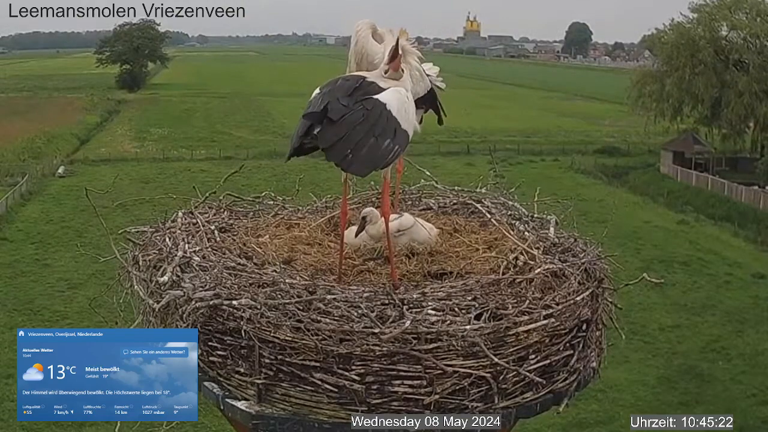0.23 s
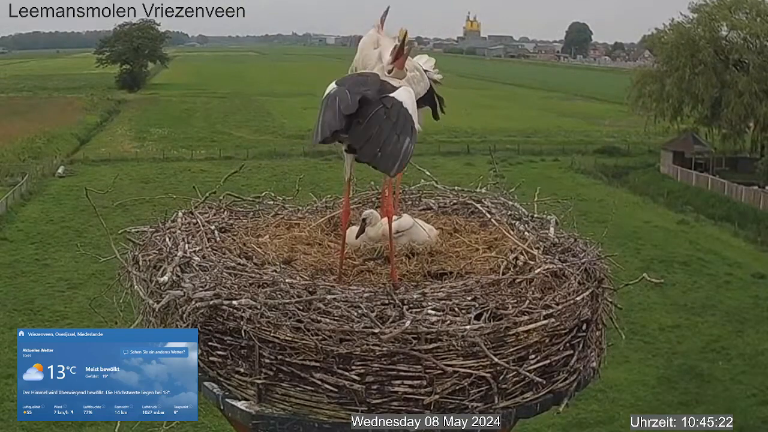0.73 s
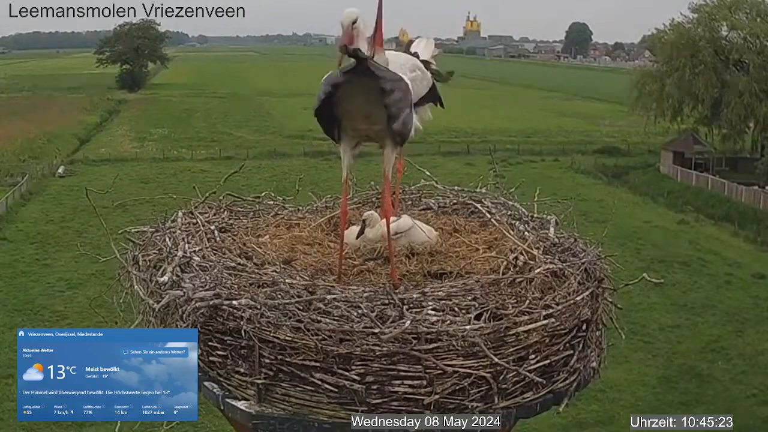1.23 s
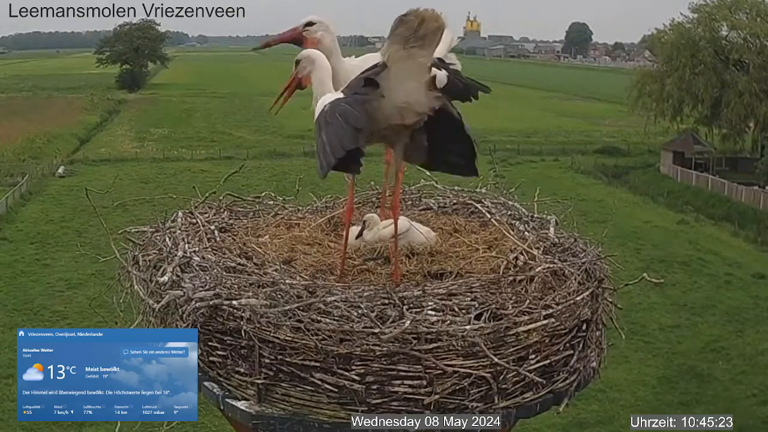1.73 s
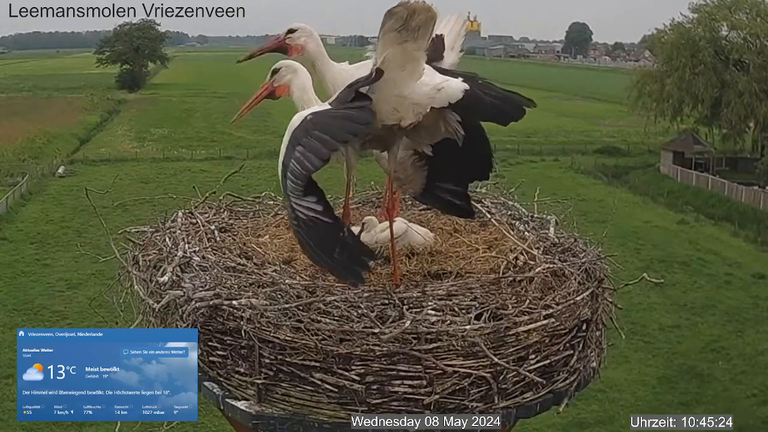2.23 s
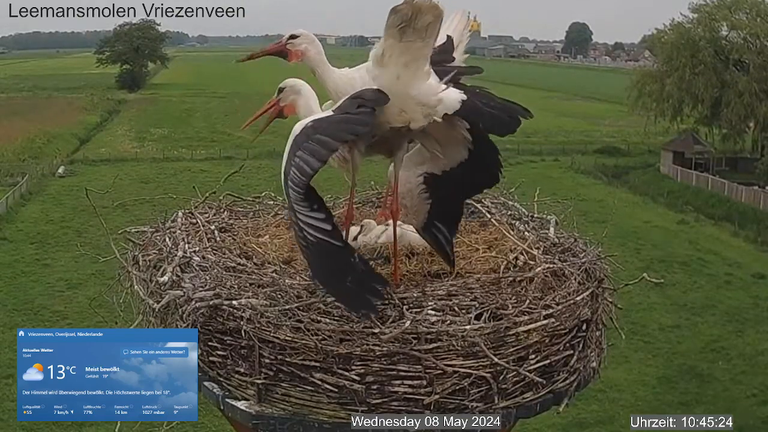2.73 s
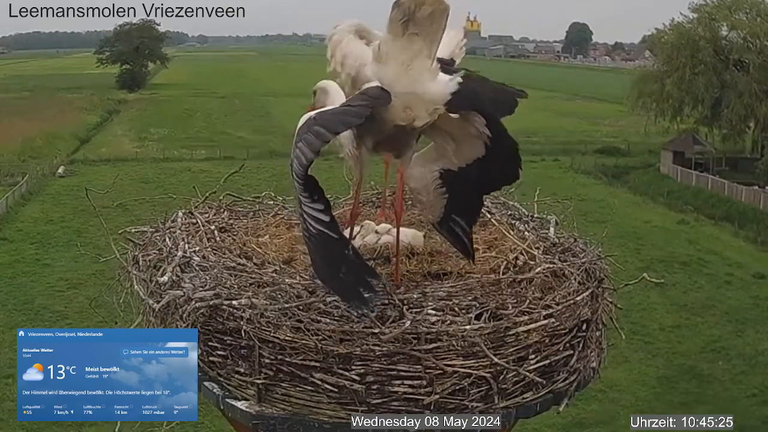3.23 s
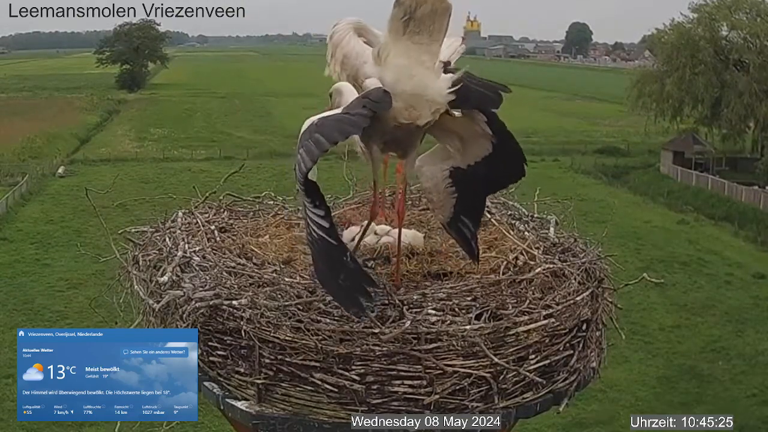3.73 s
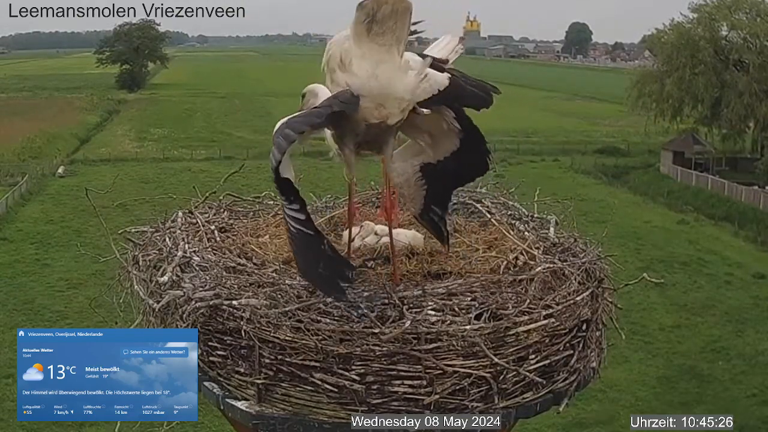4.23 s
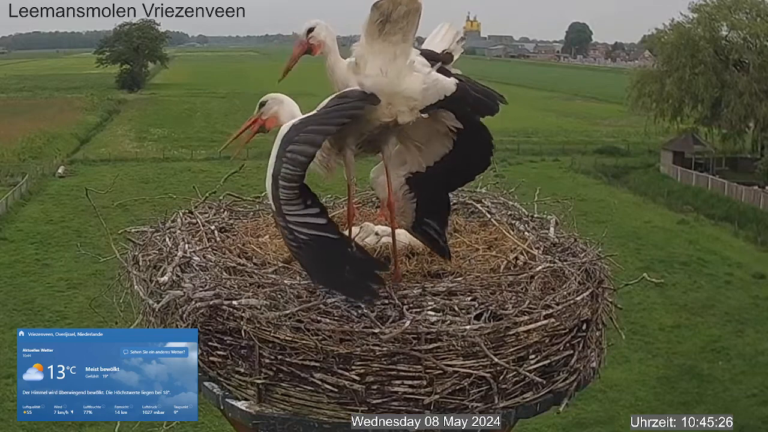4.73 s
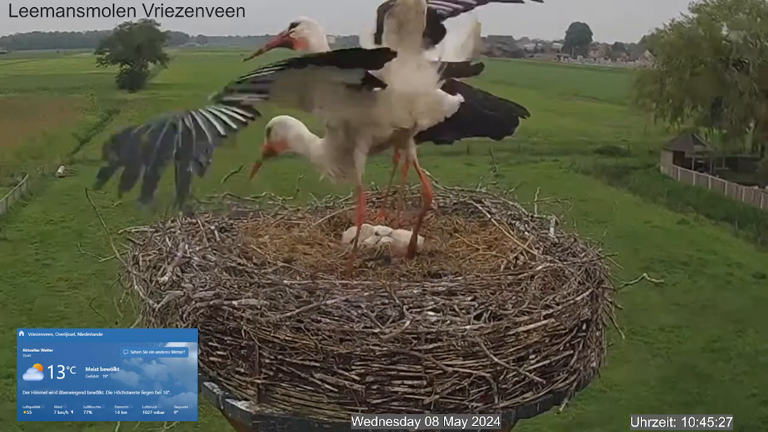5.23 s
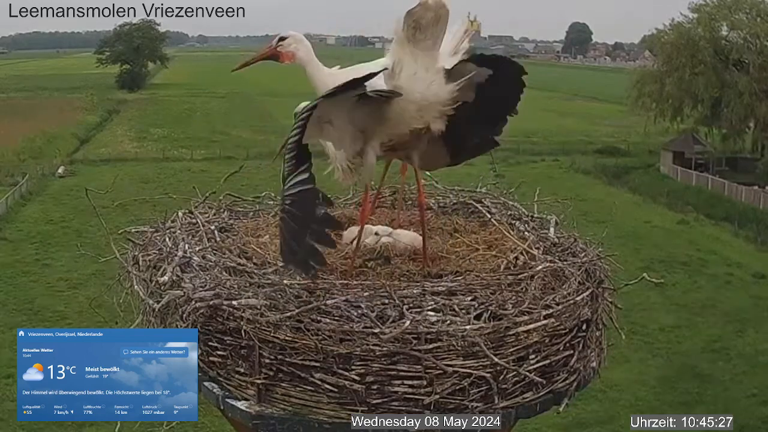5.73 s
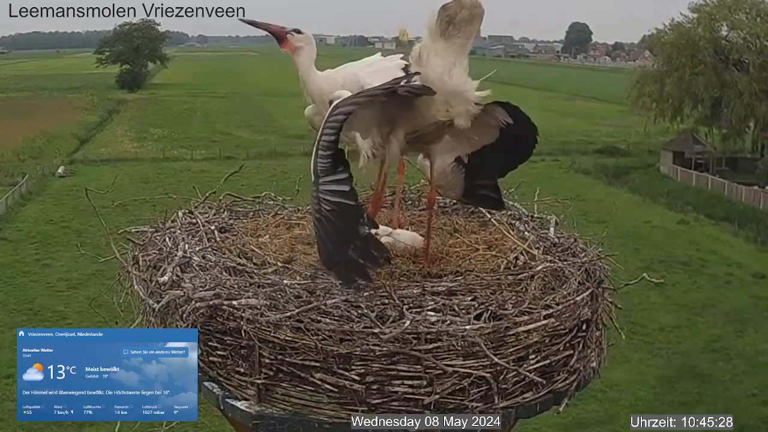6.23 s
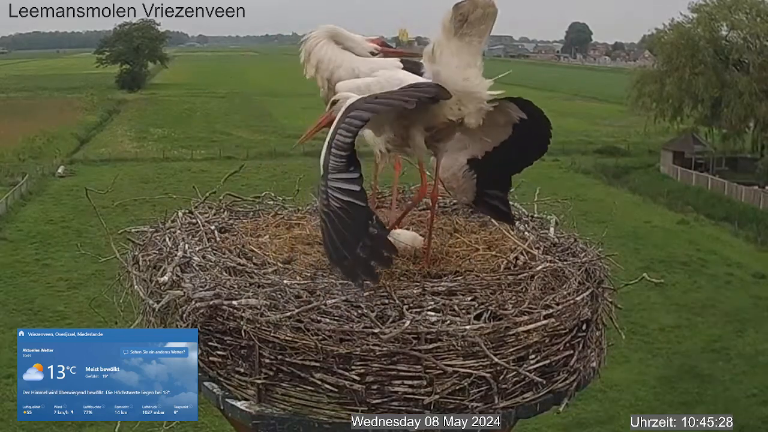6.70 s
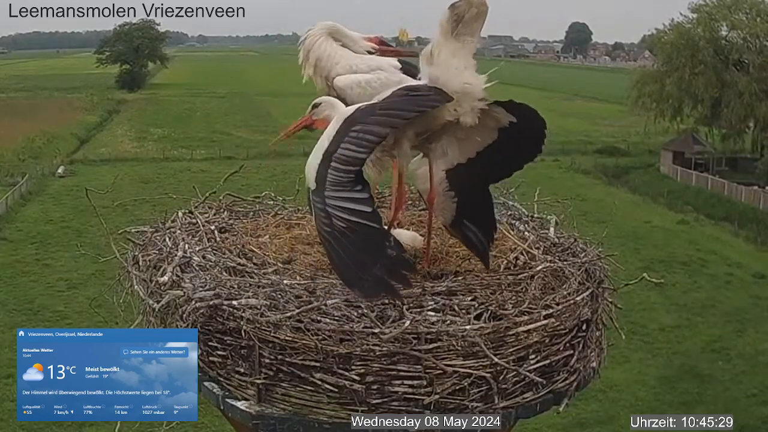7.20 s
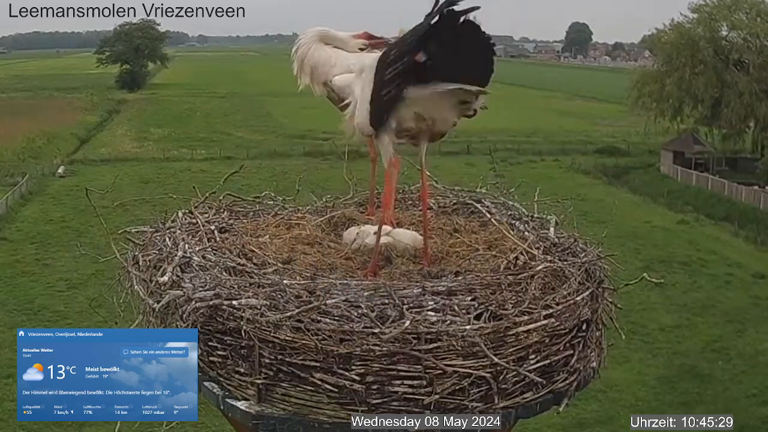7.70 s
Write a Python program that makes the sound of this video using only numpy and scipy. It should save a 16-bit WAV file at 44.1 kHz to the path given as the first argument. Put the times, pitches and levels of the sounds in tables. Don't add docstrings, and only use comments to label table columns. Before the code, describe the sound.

From the start a stork claps its bill in hard, hollow wooden knocks, about ten per second; a second, weaker and quicker to the ear, joins almost at once. Through the first second a chick wheezes airily, then rasps and peeps low around 1.0 to 1.4 s. The claps slow to about seven or eight per second by 1.5 s and turn drier, the two birds slipping in and out of step. A clear double peep sounds near 2.9 s. From 3.2 s one bird speeds to about twelve claps per second, slows after 4.3 s, then quickens again from 6.3 s. Low wind thumps come irregularly, strongest from 2.8 to 5.8 s. At 7.5 s a wingbeat puffs softly and the slower bird quickens, the rattle continuing to the end. Faint rustle, distant birds and thin hiss lie beneath; the outdoor sound is close, narrow and almost without echo.

```python
import sys
import numpy as np
from scipy import signal
from scipy.fft import rfft, irfft
from scipy.io import wavfile

SR = 44100
rng = np.random.default_rng(int(sys.argv[2]) if len(sys.argv) > 2 else 0)


def to_linear_factor(level_db):
    exponent = np.asarray(level_db, float) / 20
    return 10 ** exponent


def materialize(psi):
    bounded = np.clip(np.atleast_2d(psi).T, -1, 1)
    quanta = np.round(bounded * 32767).astype(np.int16)
    wavfile.write(sys.argv[1], SR, quanta)


N = 351036
LEAD_SAMPLES = 441


def evened(x):
    return x / np.sqrt(np.mean(x ** 2) + 1e-20)


def band(x, lo_hz, hi_hz, order=3):
    return signal.sosfilt(signal.butter(order, [lo_hz, hi_hz], "bandpass", fs=SR, output="sos"), x)


def lumps(rate_hz):
    return evened(signal.lfilter(*signal.butter(2, rate_hz, fs=SR), rng.standard_normal(N)))


def resonate(x, hz, width_hz):
    turn = np.exp(2j * np.pi * np.cumsum(hz) / SR)
    r = np.exp(-np.pi * width_hz / SR)
    return 2 * (turn * signal.lfilter([1 - r], [1, -r], x / turn)).real


def ring(t, db, hz, t60_s, rise_s):
    t = np.maximum(t, 0)
    return -to_linear_factor(db - 60 * t / t60_s) * (1 - np.exp(-t / rise_s)) * np.sin(2 * np.pi * hz * t)


def knock(t, blow_db, pouch_hz, horn_hz, pouch_db, share, snap_db, luck):
    # hz, level_db
    overtones = [(3483, 1), (4275, -10.5), (5250, -6.5), (6450, -9.5), (5983, -6.5)]
    pouch_t60_s = 0.025 * (700 / pouch_hz) ** 3.55
    clamp_db = -.45 * (np.clip(blow_db, -40, -20) + 31.5)
    horn_t60_s = 0.017 * share * (1650 / np.maximum(horn_hz, 1620)) ** 2.7 * to_linear_factor(clamp_db)
    sound = ring(t, pouch_db + 1.1, pouch_hz, pouch_t60_s, 0.00032)
    sound = sound + ring(t, -3.5, horn_hz, horn_t60_s, 0.00016)
    body_db = 0.84 + 10 * (horn_hz - 1850) / 1000
    sound = sound + ring(t, body_db, 0.8644 * horn_hz, 0.0063, 0.00091)
    upper_hz = 2612 * (horn_hz / 1650) ** 0.74 * (1 + 0.027 * luck[1])
    upper_db = -9.5 + luck[0] + 0.02 * (np.clip(blow_db, -45, -25) + 31)
    sound = sound - ring(t, upper_db, upper_hz, 0.01, .0001)
    for k, (hz, db) in enumerate(overtones):
        tip_hz = hz * (1 + luck[6 + k] / 30)
        sound = sound + ring(t, snap_db + db + 2 * luck[2 + k], tip_hz, 0.013, .00005)
    u = (t - .00012) / .00009
    return sound - to_linear_factor(snap_db + 6.5) * (1 - u ** 2) * np.exp(-u ** 2 / 2)


def posed(claps, posture, share, blow_extra_db, rebound_extra_db, lag_s):
    s, db = np.transpose(claps)
    when_s, *colour = np.transpose(posture)
    pouch_hz, horn_hz, pouch_db, snap_db = (np.interp(s, when_s, c) for c in colour)
    return np.array([s + lag_s, db, snap_db, snap_db + blow_extra_db, snap_db + rebound_extra_db,
                     pouch_hz, horn_hz, pouch_db, share + 0 * s])


def bills():
    # start_s, blow_db
    slow_opening = [(-0.0011, -32), (.0927, -27.5), (.1932, -29.5), (.291, -28), (.3914, -28),
                    (.4912, -29.5), (.5908, -29.5), (.6926, -29.5), (.8002, -28), (.9035, -29.5),
                    (1.012, -32), (1.1272, -38.5), (1.2462, -43.5), (1.3748, -44), (1.5149, -48),
                    (1.6471, -41.5)]
    slow_stretch = [(1.7885, -36.5), (1.935, -36.5), (2.0802, -30.5), (2.2253, -30.5), (2.3716, -31.5),
                    (2.5157, -32.5), (2.6594, -32), (2.8019, -34), (2.944, -34.5), (3.0868, -34.5),
                    (3.2297, -36), (3.372, -35), (3.5118, -33), (3.6543, -40), (3.7971, -39),
                    (3.9372, -32.5), (4.079, -36.5), (4.2197, -33.5), (4.3601, -34), (4.5035, -38.5),
                    (4.6494, -32), (4.798, -34), (4.9455, -34.5)]
    slow_closing = [(5.0906, -32), (5.233, -35), (5.522, -31), (5.667, -33.5), (5.8138, -38.5),
                    (5.959, -34), (6.1041, -38), (6.247, -32), (6.39, -34), (6.5329, -32), (6.8133, -39.5),
                    (6.9501, -32.5), (7.0876, -35), (7.2141, -40.5), (7.4696, -36.5), (7.5567, -32),
                    (7.6504, -33), (7.7465, -32), (7.84, -29.5), (7.936, -30)]
    # start_s, blow_db
    quick_opening = [(.0862, -43), (.1784, -42), (.2709, -41), (.3635, -47), (.4623, -46), (.5601, -43),
                     (.6578, -43.5), (.7586, -41), (.8632, -38.5), (.9726, -37.5), (1.0896, -35.5),
                     (1.2096, -34.5), (1.3305, -38), (1.4547, -36.5), (1.5776, -32), (1.7071, -31.5),
                     (1.8316, -30.5), (1.9583, -30.5), (2.0873, -30), (2.2121, -32), (2.3409, -30),
                     (2.4654, -34.5), (2.59, -32), (2.7108, -30), (2.8205, -30.5), (2.914, -43.5)]
    quick_second = [(3.012, -65), (3.171, -59), (3.2515, -35), (3.3343, -42.5), (3.4159, -44),
                    (3.5006, -37), (3.5861, -42.5), (3.6693, -36.5), (3.7523, -41.5), (3.839, -38.5),
                    (3.9271, -38.5), (4.0153, -42), (4.104, -36), (4.2006, -32), (4.305, -36.5),
                    (4.415, -37.5), (4.5285, -32), (4.6436, -36), (4.7624, -31.5), (4.8808, -30.5),
                    (5.0051, -33), (5.1277, -33), (5.254, -32), (5.3797, -30), (5.5102, -33), (5.638, -34),
                    (5.7637, -34), (5.8878, -34.5), (6.0115, -30.5)]
    quick_third = [(6.1291, -29), (6.2356, -32.5), (6.3363, -32), (6.4318, -31), (6.521, -42.5),
                   (6.5988, -48), (6.6731, -38), (6.7499, -42.5), (6.8259, -37), (6.9001, -40.5),
                   (6.9778, -40), (7.059, -41), (7.1413, -37), (7.2262, -34), (7.3133, -40.5),
                   (7.4022, -38.5), (7.489, -33.5), (7.577, -34.5), (7.6656, -34.5), (7.7531, -33.5),
                   (7.9411, -32.5)]
    # start_s, pouch_hz, horn_hz, pouch_db (above horn), snap_db (toward the microphone)
    slow_posture = [(0, 837, 1725, -9.5, -15.5), (.5, 925, 1608, -6, -23), (.9, 882, 1780, -9, -21),
                    (1.37, 970, 1810, 2, -12), (1.65, 767, 2190, -4, -11.5), (2.08, 730, 2057, -9, -17.5),
                    (2.8, 762, 1930, -10, -18.5), (2.95, 730, 1850, -10.5, -17.5),
                    (3.23, 750, 1900, -7, -18.5), (4.22, 758, 1996, -3.5, -20), (4.65, 757, 1872, -8, -17),
                    (5.52, 767, 1900, -9.5, -21.5), (5.67, 750, 1915, -9.5, -19.5),
                    (6.39, 772, 1930, -8.5, -17), (6.81, 790, 1944, -8.5, -16), (7.21, 860, 1896, -3, -12),
                    (7.47, 954, 1410, -3, -28.5), (7.84, 987, 1712, -5, -19)]
    quick_posture = [(.08, 850, 1606, -9, -6), (0.559, 840, 1683, -2, -8), (.87, 830, 1640, -10.5, -4),
                     (1.33, 726, 2160, -5.5, -15), (1.46, 700, 2106, -9.5, -12.5),
                     (1.57, 679, 1763, -15, -15.5), (1.83, 673, 1800, -15, -21.5),
                     (2.7, 696, 1850, -15.5, -19.5), (2.92, 790, 1790, -13, -17),
                     (3.3, 843, 1585, -14.5, -9.5), (3.67, 973, 1592, -5, -7.5),
                     (4.42, 846, 1660, -9.5, -17.5), (4.76, 704, 1976, -13.5, -18.5),
                     (5.642, 677, 1874, -12.5, -19), (6.43, 775, 1737, -17, -25.5),
                     (6.601, 815, 1574, -5.5, -22), (6.9, 990, 1612, -2.5, -15),
                     (7.95, 923, 1653, -4, -29.5)]
    slow = posed(slow_opening + slow_stretch + slow_closing, slow_posture,
                 share=0.8143, blow_extra_db=0, rebound_extra_db=-2, lag_s=.0006)
    quick = posed(quick_opening + quick_second + quick_third, quick_posture,
                  share=0.9, blow_extra_db=7, rebound_extra_db=-11, lag_s=.0003)
    s, db, snap_db, blow_snap_db, rebound_snap_db, *colour = np.hstack([slow, quick])[:, :, None]
    luck = np.clip(rng.standard_normal((len(s), 13)), -2, 2).T[:, :, None]
    t = np.arange(2600) / SR
    swing_s = 1 / colour[1]
    touch = to_linear_factor(-14.5 + 2 * luck[12]) * knock(t, db, *colour, snap_db - 7, luck)
    blow = knock(t - 1.049 * swing_s, db, *colour, blow_snap_db, luck)
    rebound_s = (3.166 + luck[10] / 20) * swing_s
    rebound = to_linear_factor(9.5 + luck[11]) * knock(t - rebound_s, db, *colour, rebound_snap_db, luck[::-1])
    claps = (touch + blow + rebound) * to_linear_factor(db + 0.5)
    bodies = rng.standard_normal(claps.shape) * to_linear_factor(-30 - 60 * t / .022) * (t > .001)
    claps = claps + signal.fftconvolve(claps, bodies, axes=1)[:, :2600]
    out = np.zeros(N + 2 * LEAD_SAMPLES + 2600)
    first = np.round((s - .0009) * SR).astype(int) + LEAD_SAMPLES
    np.add.at(out, first + np.arange(2600), claps)
    out = signal.lfilter(*signal.iirnotch(1190, 4.5, SR), out)
    return band(out, 555, 6700)[LEAD_SAMPLES:LEAD_SAMPLES + N]


def nest(x):
    t = np.arange(9000) / SR
    tail = rng.standard_normal(len(t)) * to_linear_factor(-60 * t / .11) * (t > .004)
    tail = np.diff(tail)
    return to_linear_factor(-21) * signal.oaconvolve(x, tail / np.linalg.norm(tail) * 2)[:N]


def whistles(calls):
    out, air = np.zeros(N), rng.standard_normal(N)
    for s, length_s, db, from_hz, to_hz, blur_hz in calls:
        at = round(s * SR)
        hz = np.linspace(from_hz, to_hz, round(length_s * SR))
        voice = resonate(air[at:at + len(hz)], hz, blur_hz)
        voice = evened(resonate(voice, hz, blur_hz))
        out[at:at + len(hz)] += to_linear_factor(db) * voice * signal.windows.tukey(len(hz), 0.56)
    return out


def chick():
    # start_s, length_s, level_db, from_hz, to_hz
    wheezes = [
        (0.058, .06, -69.5, 2180, 2470),
        (0.114, 0.085, -65, 2650, 2900),
        (0.586, 0.15, -76, 2900, 2650),
        (0.76, 0.12, -62.5, 2620, 2720),
        (0.855, .1, -63.5, 2520, 2350),
        (1.47, 0.084, -72, 2450, 2450),
        (1.88, 0.083, -69.5, 2740, 2880),
        (6.242, 0.24, -71, 2660, 2480),
    ]
    # start_s, length_s, level_db, from_hz, to_hz
    peeps = [
        (1.069, 0.09, -64, 1296, 1200),
        (1.313, 0.1, -67, 1304, 980),
        (2.4, 0.046, -83, 3100, 3080),
        (2.856, 0.066, -73.5, 2650, 2700),
        (2.894, 0.12, -56, 2570, 2703),
        (2.996, 0.067, -56, 2607, 2550),
        (3.42, 0.043, -75, 2460, 2300),
        (4.257, 0.056, -82, 2300, 2240),
        (5.176, 0.037, -90, 3100, 3100),
        (6.56, 0.12, -79, 2450, 2620),
    ]
    # centre_hz, blur_hz, level_db
    rasp = [(960, 180, -74), (1850, 260, -62.5), (2300, 250, -71.5), (2900, 320, -69), (3660, 490, -78.5),
            (5840, 600, -78)]
    calls = [(*row, 230) for row in wheezes] + [(*row, 89.5) for row in peeps]
    calls += [(1.047, 0.26, db, hz, 1.08 * hz, blur_hz) for hz, blur_hz, db in rasp]
    return whistles(calls)


def wing():
    near = np.exp(-.5 * ((np.arange(N) / SR - 7.534) / 0.0096) ** 2)
    return to_linear_factor(-41) * near * evened(band(rng.standard_normal(N), 137, 420))


def gusts(t, start_s, life_s, peak_db):
    age = (t[:, None] - start_s) / life_s
    fall_db = 35 * np.where(age < 0, -age / 0.78, age)
    return 10 * np.log10((to_linear_factor(peak_db - fall_db) ** 2).sum(1) + to_linear_factor(-100) ** 2)


def wind():
    # start_s, buffet_db, life_s, rumble_db
    gust_events = [(0, -47.5, 0.048, -56.5), (0.327, -46.5, 0.073, -45), (1.765, -49.5, 0.15, -44),
                   (2.685, -63, 0.063, -60), (2.788, -42, 0.017, -47.5), (2.888, -59, 0.097, -52),
                   (3.03, -43.5, 0.062, -48.5), (3.122, -45, 0.1, -47.5), (3.238, -51, 0.17, -46),
                   (3.349, -33, 0.049, -47.5), (3.752, -48.5, 0.05, -71.5), (3.831, -50.5, 0.22, -45.5),
                   (3.905, -34.5, 0.035, -63.5), (4.182, -48.5, 0.038, -45.5), (4.309, -49, 0.088, -48),
                   (4.532, -47, 0.083, -48), (4.671, -49.5, 0.21, -48.5), (4.767, -38, 0.045, -67),
                   (4.85, -62, 0.14, -64), (4.96, -61, 0.05, -50), (5.121, -40, 0.029, -47),
                   (5.48, -40.5, 0.055, -45), (5.652, -45.5, 0.04, -40.5), (5.764, -38, 0.025, -40.5),
                   (6.12, -52, 0.13, -49.5), (6.299, -45, 0.065, -49.5), (6.737, -49, 0.051, -44.5),
                   (6.922, -50.5, 0.12, -75), (7.108, -52.5, 0.033, -62), (7.532, -53, 0.047, -74)]
    # start_s, level_db
    breeze = [(0, -85.5), (.5, -81.5), (.65, -72), (.9, -64.5), (1.03, -94), (1.45, -87.5), (1.9, -68),
              (2.2, -80.5), (2.5, -67), (3.5, -57), (3.66, -76), (4.95, -62), (5.27, -69), (6.0, -61.5),
              (6.43, -85), (6.9, -64.5), (7.3, -79.5), (7.96, -66.5)]
    t, slow_t = np.arange(N) / SR, np.arange(0, N, 64) / SR
    start_s, buffet_db, life_s, rumble_db = np.transpose(gust_events)
    buffet_db = np.interp(t, slow_t, gusts(slow_t, start_s, life_s, buffet_db))
    rumble_db = np.interp(t, slow_t, gusts(slow_t, start_s, .22, rumble_db))
    push = np.hypot(to_linear_factor(rumble_db), to_linear_factor(np.interp(t, *np.transpose(breeze))))
    noise = rng.standard_normal((3, N))
    rumble = evened(band(noise[0], 14, 65, order=2) * to_linear_factor(4.2 * lumps(16)))
    eddy_db = 4.0 * lumps(35)
    buffet = evened(band(noise[1], 60, 210) * to_linear_factor(eddy_db))
    flap = evened(band(noise[2], 190, 430) * to_linear_factor(eddy_db))
    flap_db = -63 + 2.07 * (buffet_db + 47.0)
    return push * rumble + to_linear_factor(buffet_db) * buffet + to_linear_factor(flap_db) * flap


def coloured(points, x):
    hz = np.fft.rfftfreq(len(x), 1 / SR)
    f, db = np.transpose(points)
    gain_db = np.interp(np.log(hz + 1), np.log(f + 1), db)
    return evened(irfft(rfft(x) * to_linear_factor(gain_db), len(x)))


def rustle():
    # start_s, level_db
    stir_levels = [(0, -76.5), (.72, -68.5), (1, -75.5), (1.15, -70.5), (1.42, -74), (1.6, -82),
                   (1.93, -74), (2.097, -82), (3.299, -82), (6.302, -80.5), (7.3, -78)]
    # freq_hz, density_db
    air_spectrum = [(240, -33), (500, -7.5), (1900, -12), (2600, -16.5), (6400, -17.5), (7600, -23)]
    level_db = np.interp(np.arange(N) / SR, *np.transpose(stir_levels))
    hiss, stir = (coloured(air_spectrum, rng.standard_normal(N)) for _ in range(2))
    flicker_db = 2.5 * lumps(14)
    haze = evened(resonate(hiss, 2300 + 300 * lumps(1.3), 220)) * to_linear_factor(-90.5 + 5.5 * lumps(5))
    return to_linear_factor(-82.0 + flicker_db) * hiss + to_linear_factor(level_db + flicker_db) * band(stir, 150, 3300) + haze


def far_tones():
    # start_s, length_s, level_db, from_hz, to_hz
    pipes = [
        (1.7, 0.28, -86.5, 1980, 2000),
        (5.004, 0.86, -90, 1970, 2020),
        (7.574, 0.089, -78, 2430, 2970),
    ]
    return whistles([(*row, 89.5) for row in pipes])


def scene():
    claps = bills()
    return (claps + nest(claps) + chick() + wing() + wind() + rustle() + far_tones())[None]


def roll_off(x):
    return signal.sosfilt(signal.butter(12, 7810, fs=SR, output="sos"), x)


def record(dry):
    soft = np.tanh(11 * dry) / 11
    narrow = signal.sosfilt(signal.cheby2(12, 40, 7850, fs=SR, output="sos"), soft)
    lag_s = np.arange(-LEAD_SAMPLES, LEAD_SAMPLES + 1) / SR
    smear = (lag_s == 0) + to_linear_factor(-57 - 1800 * abs(lag_s)) * rng.standard_normal(len(lag_s))
    return roll_off(signal.oaconvolve(narrow, smear[None], "same"))


dry = scene()
out = record(dry)
materialize(out)
```